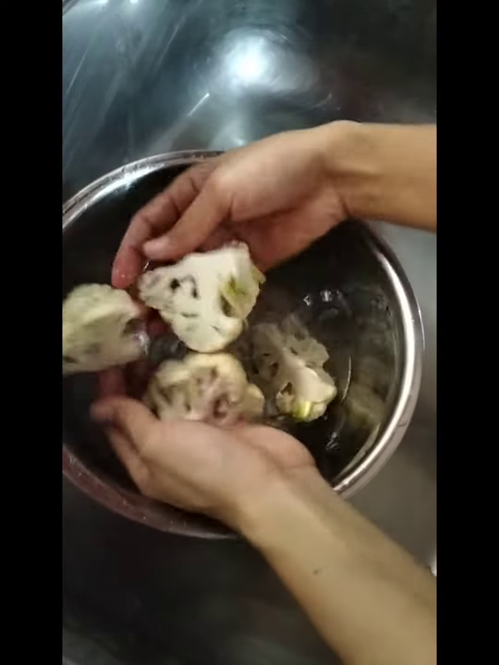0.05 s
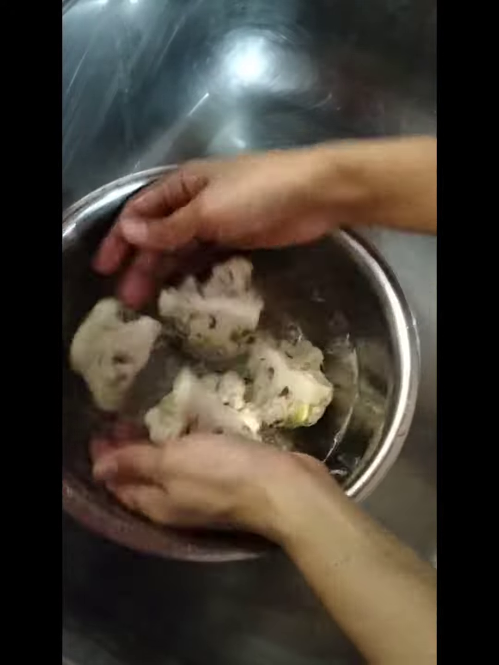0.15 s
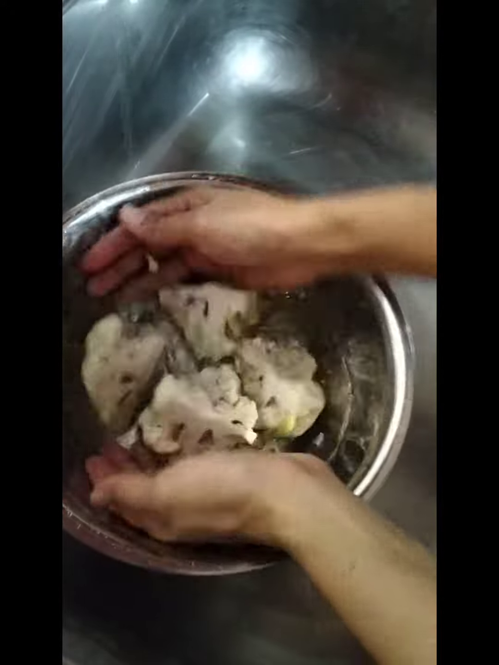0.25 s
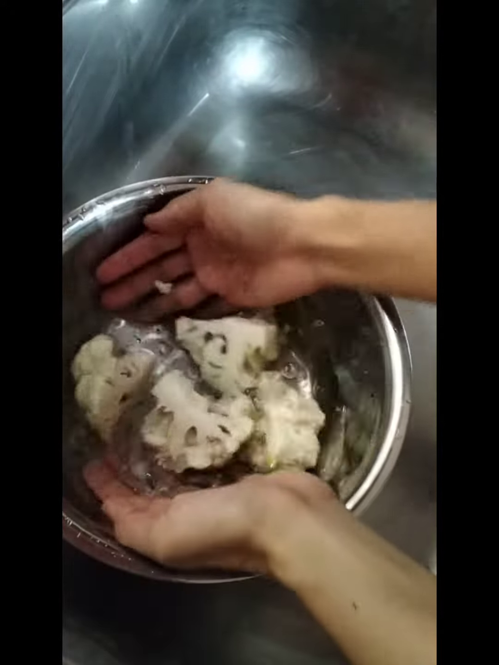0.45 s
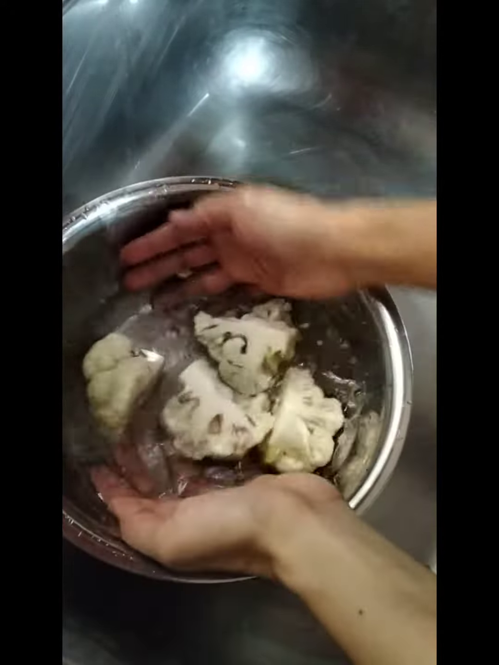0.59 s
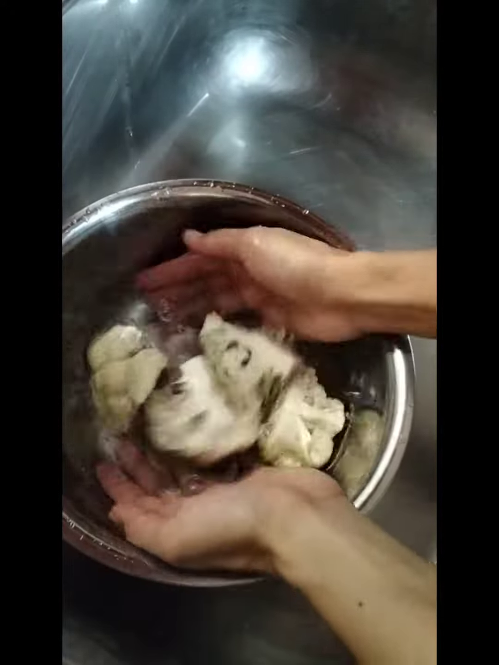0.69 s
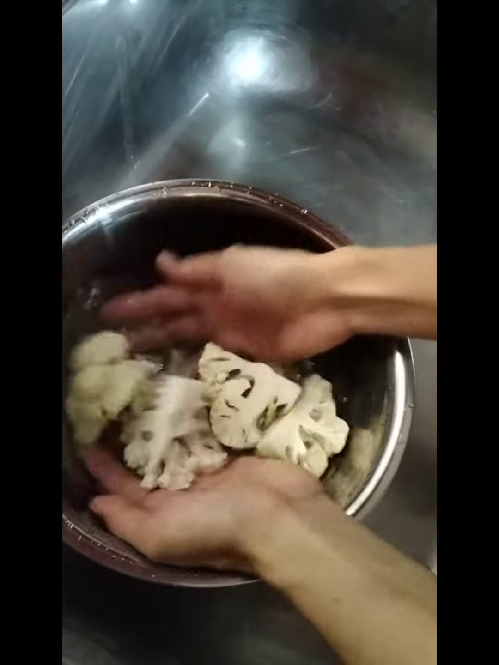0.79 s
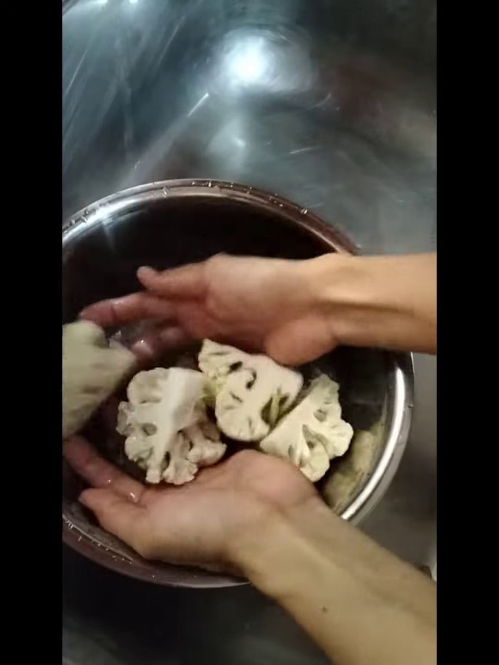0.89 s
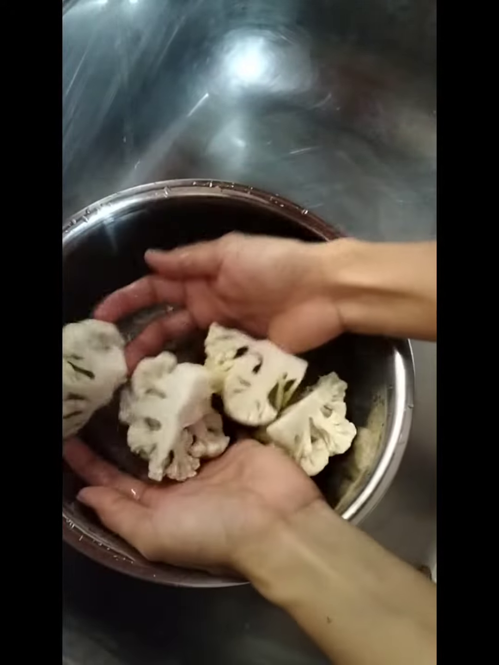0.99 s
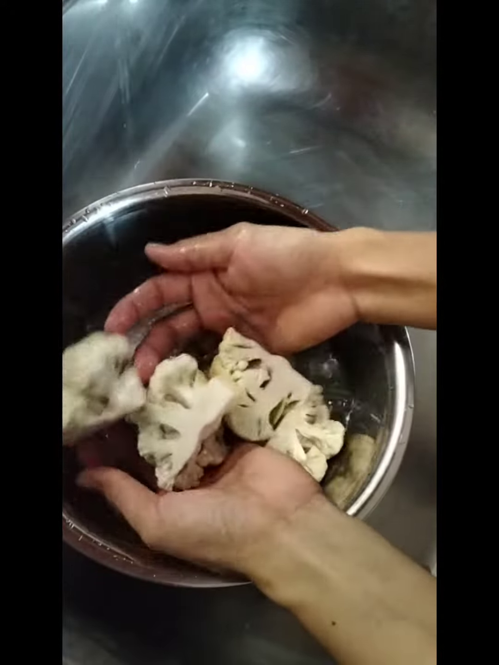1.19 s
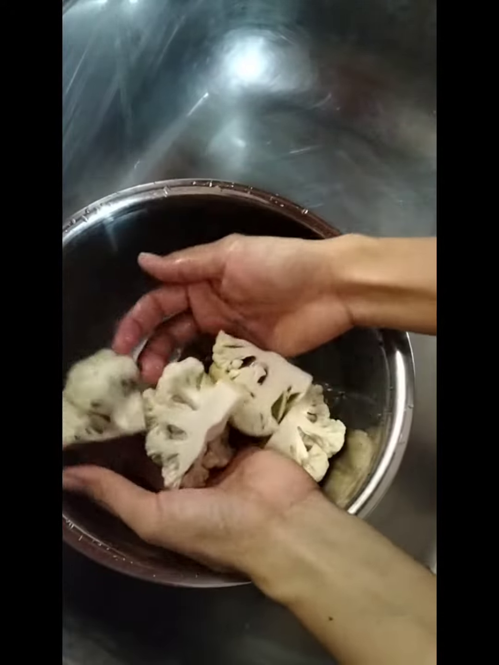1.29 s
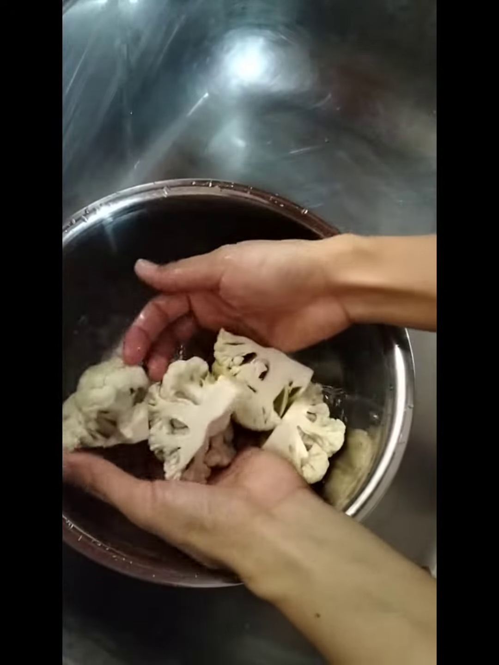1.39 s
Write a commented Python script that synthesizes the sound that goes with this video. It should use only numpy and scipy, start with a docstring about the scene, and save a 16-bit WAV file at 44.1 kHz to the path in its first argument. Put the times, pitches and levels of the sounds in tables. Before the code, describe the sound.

Water splashing in a metal bowl as vegetable pieces drop in, then small gulps and plinks

```python
"""Florets into a bowl of water

Hands let cauliflower florets drop into a steel bowl of water in a kitchen sink, then scoop them up again.
Slaps are crackling noise bursts; air pockets plink and gulp as sines; knocked steel rings as damped modes.
Stirred water fizzes and gurgles as swarms of tiny bubbles with noise, and drips tick above a room tone.
The sink and a small kitchen answer with decaying noise tails."""
import sys
import numpy as np
from scipy import signal
from scipy.fft import rfft, irfft, next_fast_len
from scipy.io import wavfile
from scipy.ndimage import map_coordinates

SR = 44100
rng = np.random.default_rng(int(sys.argv[2]) if len(sys.argv) > 2 else 0)


def bounce(signal):
    """Save signal as a 16-bit WAV file at the path given by the first command-line argument."""
    frames = np.transpose(np.atleast_2d(signal))
    limited = np.clip(frames, -1, 1)
    pcm = np.round(limited * 32767).astype(np.int16)
    wavfile.write(sys.argv[1], SR, pcm)


N = 63945  # length in samples


def amp(db):
    """Decibels to gain."""
    return 10 ** (np.asarray(db) / 20)


def unit(x):
    """Scale to rms 1."""
    return x / np.sqrt(np.mean(x ** 2) + 1e-20)


def along(points, hz):
    """Read a curve of (Hz, value) points on a log frequency axis."""
    f, v = np.transpose(points)
    return np.interp(np.log(hz + 1), np.log(f + 1), v)


def add(out, s, x):
    """Mix x into out from time s in seconds."""
    i = max(0, round(s * SR))
    out[i:i + len(x)] += x[:max(0, len(out) - i)]


def coloured(x, points):
    """Shape a texture with a fixed spectrum, at rms 1."""
    m = next_fast_len(len(x))
    gain = amp(along(points, np.fft.rfftfreq(m, 1 / SR)))
    return unit(irfft(rfft(x, m) * gain, m)[:len(x)])


def wobble(t, rate):
    """A smooth random curve over times t, with rate knots a second."""
    return map_coordinates(rng.standard_normal(4096), [t * rate], mode="wrap")


BUBBLE_ATTACK_CYCLES = 0.92  # time constant of the onset
BUBBLE_WAVER, WAVER_CYCLES = 0.04, 3  # relative pitch unsteadiness; cycles between its random knots


def ping(t, hz, t60, rise):
    """A bubble: a damped sine whose pitch glides by rise, in octaves per second."""
    glide = 1 + np.log(2) * rise * t / 2
    onset = 1 - np.exp(-t * hz / BUBBLE_ATTACK_CYCLES)
    return np.sin(2 * np.pi * hz * t * glide) * amp(-60 * t / t60) * onset


def waver(t, hz):
    """Time drift that makes a pitch unsteady in moving water."""
    return BUBBLE_WAVER * np.cumsum(wobble(t, hz / WAVER_CYCLES)) / SR


def swarm(count, low_hz, high_hz, cycles, spread_db):
    """Many bubbles of random time, pitch, size and life, at rms 1."""
    when, pitch, size, life = rng.random((count, 4)).T[..., None]
    hz = low_hz * (min(high_hz, SR / 2) / low_hz) ** pitch
    k = np.arange(SR // 25)
    level_db = spread_db * np.minimum(-np.log(1 - size), 4)  # most are faint, a few stand out
    grains = amp(level_db) * ping(k / SR, hz, cycles * (.5 + life) / hz, rise=2)
    places = ((when * N).astype(int) + k) % N
    return unit(np.bincount(places.ravel(), grains.ravel(), N))


# how hard the water is stirred (t/s, fizz level/dB, gurgle level/dB)
STIR = [(0, -59, -58.5), (0.098, -65, -68), (0.152, -53.5, -50), (.2, -43.5, -44), (0.246, -34, -37),
        (.27, -32, -31.5), (0.309, -40.5, -39), (.37, -52, -53), (0.439, -61.5, -57.5), (0.472, -49.5, -44),
        (.52, -54, -59.5), (.57, -65, -71), (.68, -62.5, -63), (.715, -54.5, -57), (.80, -52.5, -58),
        (0.867, -60.5, -52.5), (.915, -48, -57.5), (.98, -65, -59), (1.04, -63.5, -63), (1.25, -70.5, -71),
        (1.45, -69.5, -66.5)]
# spectrum of fizz and spray (f/Hz, level/dB)
FIZZ_COLOUR = [(500, -16.5), (1200, -5.5), (2000, -4), (3300, 2.5), (4800, -2.5), (7200, 1.5), (8300, -10),
               (9500, -34.5), (12000, -17), (15000, -19.5)]
# spectrum of the gurgle (f/Hz, level/dB)
GURGLE_COLOUR = [(100, -8), (230, -4.5), (310, -13.5), (520, 1), (680, -3), (900, 3), (1500, -4),
                 (2100, -4)]
# spectrum of the heaving water (f/Hz, level/dB)
SLOSH_COLOUR = [(30, -21.5), (70, -10.5), (140, 5), (180, -19.5), (240, 1.5), (320, -9.5), (1000, -45)]
SLOSH_DB = -7  # against the gurgle


def stirring():
    """Moving water: fine bubble fizz and noisy spray over a lower gurgle and a soft heave."""
    t = np.arange(N) / SR
    s, *levels = np.transpose(STIR)
    fizz_db, gurgle_db = [np.interp(t, s, c) for c in levels]
    fizz = swarm(count=2400, low_hz=1118, high_hz=10260, cycles=24, spread_db=3.5)
    spray = unit(rng.standard_normal(N) * amp(2.6 * wobble(t, 500)))
    bright = coloured(fizz + amp(3.0) * spray, FIZZ_COLOUR)
    low_bubbles = swarm(count=1600, low_hz=201, high_hz=1804, cycles=8.6, spread_db=3.0)
    gurgle = coloured(low_bubbles, GURGLE_COLOUR)
    slosh = amp(SLOSH_DB) * coloured(rng.standard_normal(N), SLOSH_COLOUR)
    return amp(fizz_db) * bright + amp(gurgle_db) * (gurgle + slosh)


# spectrum of the room tone (f/Hz, level/dB)
FLOOR = [(25, -21), (65, 12.5), (115, 12), (180, -11.5), (260, -1.5), (600, -8), (2000, -16.5),
         (7000, -35.5), (9500, -39), (15000, -29)]
FLOOR_DB = -64


def room_tone():
    """Steady coloured noise under everything."""
    return amp(FLOOR_DB) * coloured(rng.standard_normal(N), FLOOR)


# slaps on the water (t/s, level/dB, t60/s, tilt/dB per octave)
SLAPS = [(.001, -47, 0.081, -5), (.015, -57.5, 0.024, 2), (0.106, -54, 0.054, 3), (0.2118, -42, 0.099, -2),
         (0.2366, -32.5, 0.15, 0.5), (0.2469, -15.5, 0.023, 2), (0.2559, -20, 0.034, 5),
         (0.282, -33, 0.013, 6.5), (0.287, -28.5, 0.034, -6), (0.3354, -37, 0.014, 5),
         (0.453, -37.5, 0.037, -1.5), (0.469, -35.5, 0.045, 0.5), (0.5071, -28.5, 0.026, 1.5),
         (.513, -41.5, 0.07, 0), (0.689, -37, 0.053, 8), (0.7007, -20.5, 0.0089, 0),
         (.704, -36.5, 0.06, -4.5), (0.862, -44, 0.09, -6), (.889, -29.5, 0.064, -0.5),
         (0.922, -39, 0.021, 1.5), (0.964, -47, .022, 0), (1.389, -54.5, 0.052, -2.5)]
# spectrum of a slap before its tilt (f/Hz, level/dB)
SLAP_COLOUR = [(100, -13), (400, -15.5), (1300, -5), (2000, -4.5), (2700, 3), (3800, -1.5), (4800, -6),
               (7000, -1), (8200, -14.5), (9500, -27.5), (12000, -27.5), (15000, -24)]
SLAP_ATTACK_S, SLAP_ROUGH_DB = 0.00068, 1  # onset time constant; depth of the crackle


def slaps():
    """Each slap is a sudden crackling noise burst that dies away fast."""
    out, t = np.zeros(N), np.arange(SR // 10) / SR
    onset = 1 - np.exp(-t / SLAP_ATTACK_S)
    for s, db, t60, tilt in SLAPS:
        colour = [(hz, level + tilt * np.log2(hz / 3000)) for hz, level in SLAP_COLOUR]
        crackle = rng.standard_normal(len(t)) * amp(SLAP_ROUGH_DB * wobble(t, 1500))
        add(out, s, coloured(crackle, colour) * amp(db - 60 * t / t60) * onset)
    return out


# air pockets, mostly small (t/s, f/Hz, level/dB, t60/s, rise/octaves per s)
BUBBLES = [(.002, 1540, -36, 0.039, -0.68), (.019, 1120, -41.5, 0.052, 0.7), (.05, 5390, -46, 0.038, 0.15),
           (.162, 855, -39, 0.16, -1.4), (.182, 776, -37.5, 0.12, 0.79), (.218, 3970, -29, .04, -0.35),
           (.238, 3780, -29, 0.034, 1), (0.2474, 1990, -11.5, 0.014, 1), (.2525, 3790, -13.5, 0.025, 1.2),
           (.256, 863, -21, 0.047, .5), (0.2538, 1264, -15.5, 0.014, 1.2), (.288, 3780, -21.5, 0.029, 1.5),
           (0.3351, 5810, -30.5, 0.041, 1.3), (.390, 811, -44, 0.081, -0.01),
           (.486, 340, -40.5, 0.17, 0.13), (0.6907, 2460, -12.5, 0.0059, 2.2),
           (0.714, 3510, -42, 0.11, 1.52), (0.834, 3200, -46.5, 0.071, 0.64), (.924, 3850, -30, 0.032, 2.3),
           (0.928, 3250, -39.5, 0.13, -1.5), (1.338, 7100, -56, .03, 1.4), (1.415, 7210, -50, 0.078, 1.7),
           (1.417, 6060, -49.5, 0.036, 1.2)]


def bubbles():
    """Air pockets, mostly small, plink; their pitch wavers as the water squeezes them."""
    out, t = np.zeros(N), np.arange(SR // 5) / SR
    for s, hz, db, t60, rise in BUBBLES:
        add(out, s, amp(db) * ping(t + waver(t, hz), hz, t60, rise))
    return out


def answer(x, t60s, delay):
    """Diffuse reflections: a noise tail, each frequency dying at its own speed."""
    hz, t, z = signal.stft(rng.standard_normal(SR // 2), SR, nperseg=256)
    decay = amp(-60 * t / along(t60s, hz)[:, None])
    tail = signal.istft(z * decay, SR, nperseg=256)[1]
    out = np.zeros(N)
    add(out, delay, signal.fftconvolve(x, tail / np.linalg.norm(tail)))
    return out


SINK_DB, SINK_T60_S = -6.5, 0.05


def sink_answer(water):
    """The sink throws the sound back almost at once and dies quickly at all frequencies."""
    return amp(SINK_DB) * answer(water, [(1000, SINK_T60_S)], delay=.002)


# reverberation of the kitchen (f/Hz, t60/s)
ROOM = [(100, 0.48), (500, 0.13), (3000, 0.41), (7000, 0.24), (15000, 0.22)]
ROOM_DB, ROOM_DELAY_S = -14.5, .008


def kitchen_answer(water):
    """The small kitchen follows later and softer, with a longer tail."""
    return amp(ROOM_DB) * answer(water, ROOM, ROOM_DELAY_S)


DRIP_DB = -68.5


def drips():
    """Drops from the hands patter on the florets: dull ticks of a cycle or two."""
    return amp(DRIP_DB) * swarm(count=130, low_hz=300, high_hz=1100, cycles=2.5, spread_db=3.5)


# large air pockets squeezed from under the florets (t/s, f/Hz, level/dB, length/s)
GULPS = [(0.171, 379, -40, 0.034), (.236, 438, -33, 0.029), (.320, 511, -36, 0.02),
         (0.372, 532, -37, 0.007), (.402, 548, -40, 0.0095), (0.451, 548, -32, 0.024),
         (0.693, 501, -43.5, 0.013), (.741, 494, -47.5, 0.018), (0.789, 537, -39, 0.017),
         (.829, 548, -43.5, 0.021), (0.886, 564, -40.5, 0.0085), (.905, 544, -37, 0.012),
         (0.951, 547, -37.5, 0.012)]
GULP_SWELL_S, GULP_T60_S = 0.0017, 0.05


def gulps():
    """A large air pocket swells, sounds while it is squeezed and stops quickly."""
    out, t = np.zeros(N), np.arange(SR // 10) / SR
    swell = 1 - np.exp(-(t / GULP_SWELL_S) ** 2)
    for s, hz, db, length in GULPS:
        drift = waver(t, hz)
        envelope = swell * amp(db - 60 * np.maximum(t - length, 0) / GULP_T60_S)
        add(out, s, envelope * np.sin(2 * np.pi * hz * (t + drift)))
    return out


# hard stalks knocking the steel wall (t/s, level/dB)
CLINKS = [(0.2105, -28.5), (.236, -28), (.2488, -12), (0.69, -37), (0.8896, -40)]
# higher modes of the wall (f/Hz, level/dB, t60/s)
STEEL = [(446.2, -15.5, 0.31), (868, -20, 0.178), (1391, -10, 0.083), (2481, 5, 0.025), (2854, -4, .05),
         (4000, -17.5, 0.064), (6800, -14, 0.06)]


def clinks():
    """A stalk knocks the steel wall; the water damps the ringing modes quickly."""
    out, t = np.zeros(N), np.arange(SR // 3) / SR
    onset = 1 - np.exp(-t / SLAP_ATTACK_S)
    for s, db in CLINKS:
        ring = 0
        for hz, level, t60 in STEEL:
            mode_db = level + rng.normal(0, 1)  # each knock excites the modes a little differently
            ring = ring + amp(mode_db - 60 * t / t60) * np.sin(2 * np.pi * hz * t)
        add(out, s, amp(db) * ring * onset)
    return out


# florets bumping the bowl (t/s, level/dB, half-cycle of the push/s)
BUMPS = [(0.279, -29.5, 0.0033), (0.2874, -24, 0.0041), (0.374, -34.5, 0.0047), (0.452, -30.5, 0.0071),
         (0.493, -42.5, 0.0029), (0.517, -41.5, 0.0063), (0.696, -39, 0.005), (.752, -32.5, 0.009),
         (0.954, -37.5, 0.0038), (1.344, -51, 0.0075)]
# low modes of the full bowl (f/Hz, level/dB, t60/s)
BOWL = [(74.3, -15, 0.23), (120, -5, 0.22), (139.5, -4, 0.25), (219.3, -1, 0.13), (270.7, -6, 0.18),
        (343, -2, 0.17)]
PUSH_DB = -1.5


def bumps():
    """A soft push out and back on the bowl, with its water-damped low ring."""
    out, t = np.zeros(N), np.arange(SR // 2) / SR
    for s, db, length in BUMPS:
        u = t / length
        push = np.sin(np.pi * u) * np.sin(np.pi * np.minimum(u / 2, 1)) ** 2
        ring = 0
        for hz, level, t60 in BOWL:
            mode_db = level + rng.normal(0, 2.1)
            mode_hz = hz * (1 + rng.normal(0, 0.026))
            softness = 1 + (hz * length) ** 2  # a slow push hardly excites high modes
            ring = ring + amp(mode_db - 60 * t / t60) * np.sin(2 * np.pi * mode_hz * t) / softness
        add(out, s, amp(db) * (amp(PUSH_DB) * push + ring * (1 - np.exp(-u))))
    return out


def scene():
    """The water and bowl, their reflections from sink and kitchen, and the room tone."""
    water = stirring() + slaps() + bubbles() + drips() + gulps() + clinks() + bumps()
    return (water + sink_answer(water) + kitchen_answer(water) + room_tone())[None]


LOW_CUT_HZ, TOP_HZ = 55, 15700


def record(dry):
    """The microphone loses the deepest bass and keeps nothing above its band limit."""
    m = next_fast_len(N + SR // 2)
    hz = np.fft.rfftfreq(m, 1 / SR)
    low_cut = (1j * hz / (LOW_CUT_HZ + 1j * hz)) ** 2
    return irfft(rfft(dry, m) * low_cut * (hz < TOP_HZ), m)[..., :N]


dry = scene()
out = record(dry)
bounce(out)
```